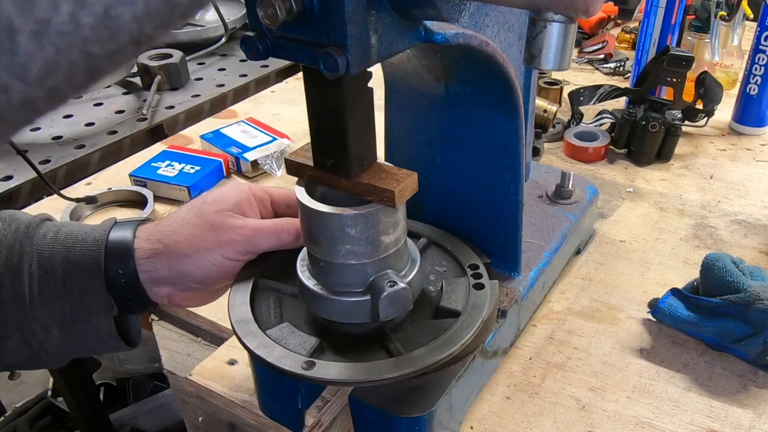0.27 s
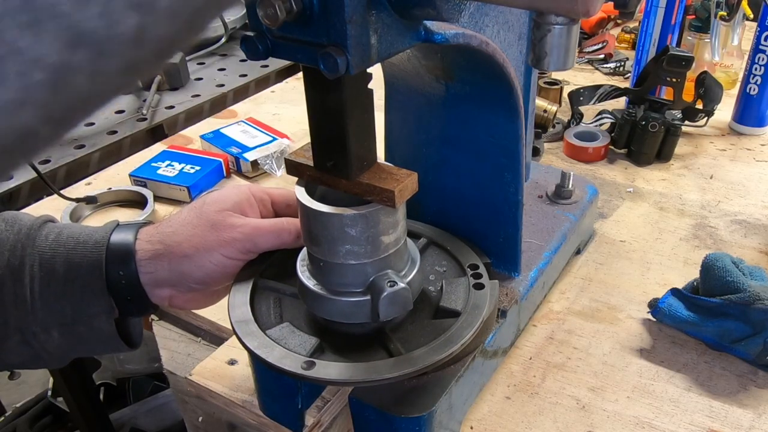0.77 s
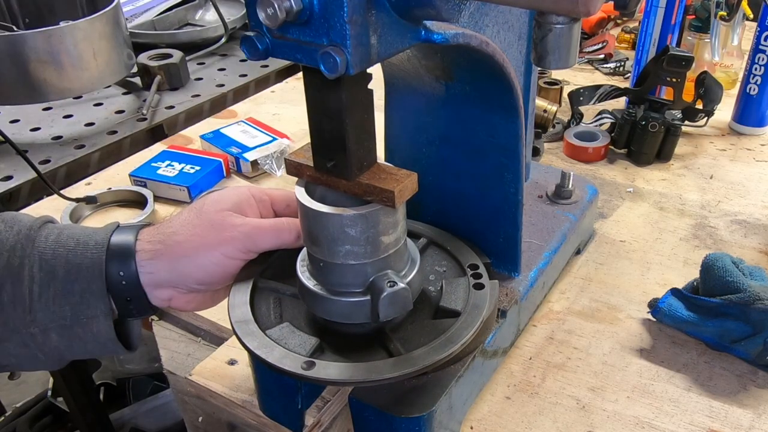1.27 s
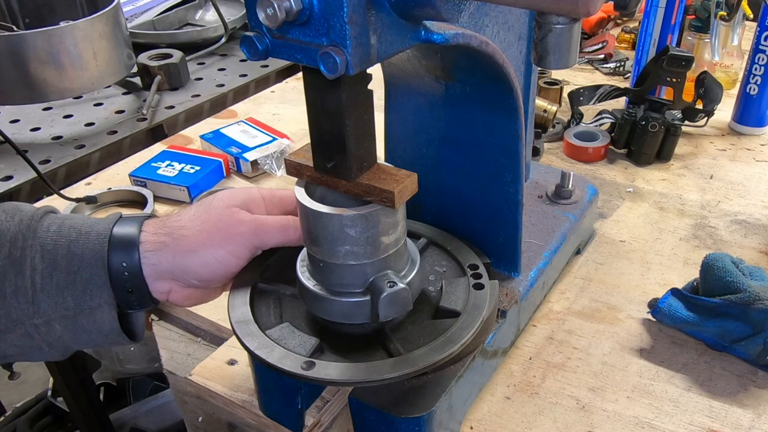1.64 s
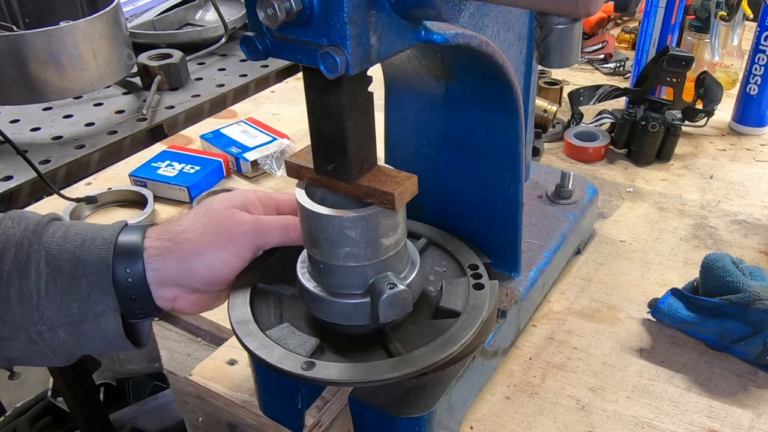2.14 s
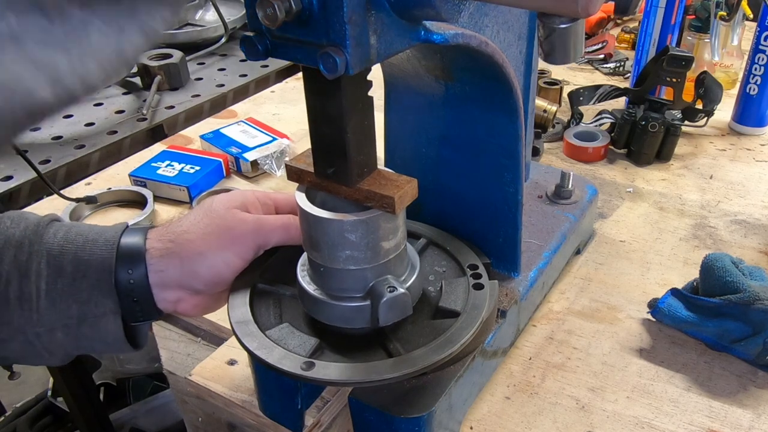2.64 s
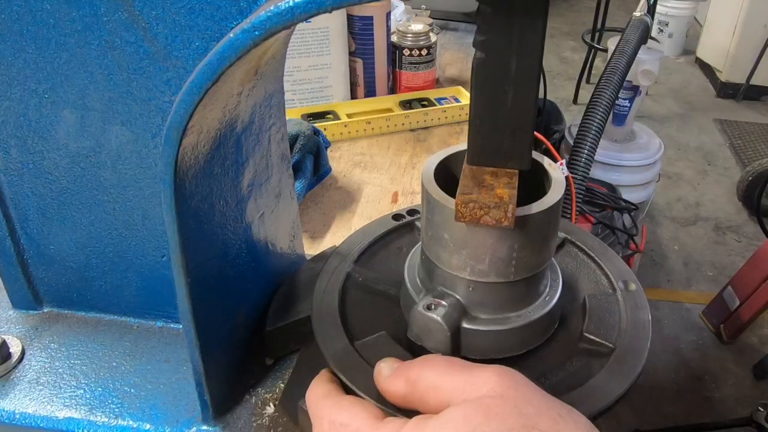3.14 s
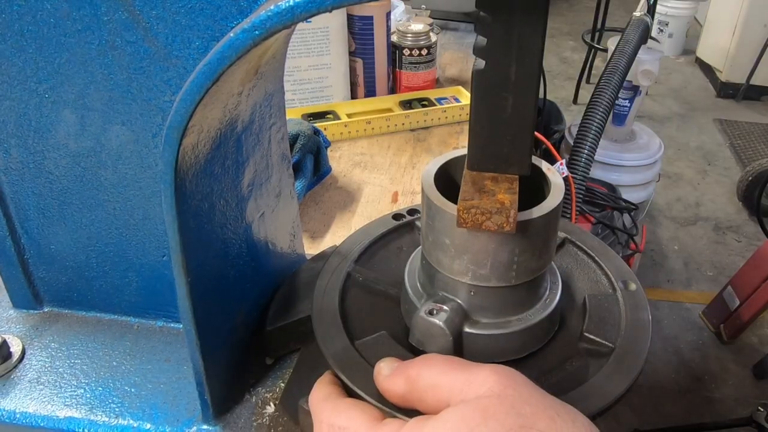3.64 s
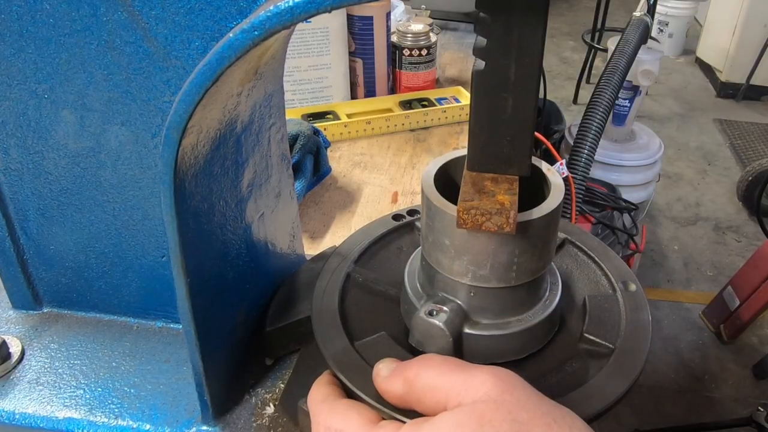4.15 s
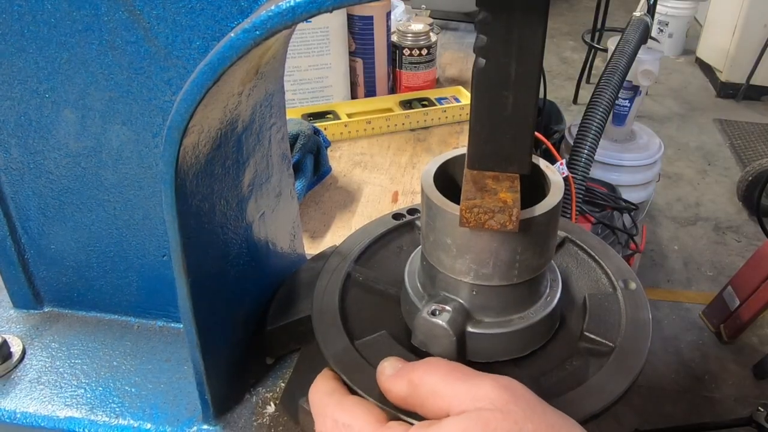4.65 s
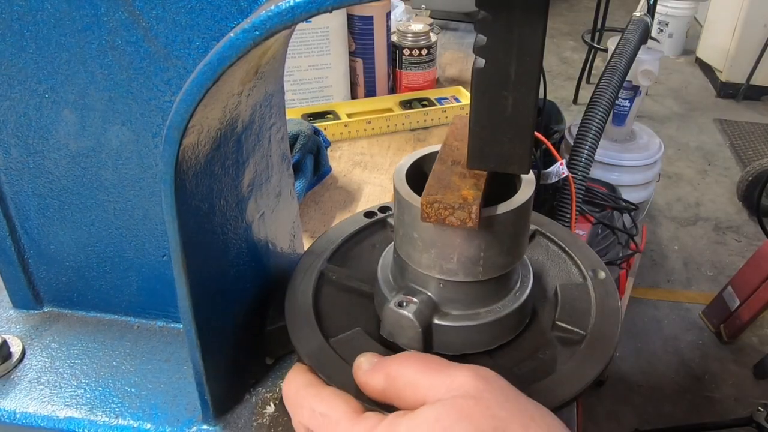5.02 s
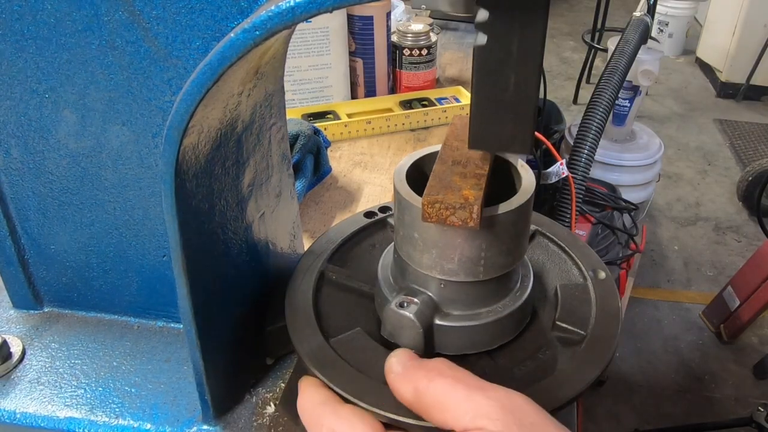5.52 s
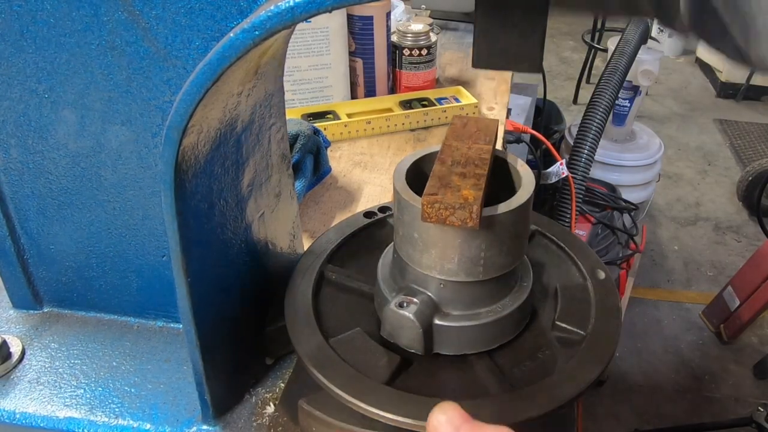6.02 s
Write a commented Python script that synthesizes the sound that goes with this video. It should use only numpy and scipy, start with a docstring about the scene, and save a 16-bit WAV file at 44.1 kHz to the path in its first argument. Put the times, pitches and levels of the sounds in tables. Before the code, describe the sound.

In a small workshop, a press lands deep knocks, a part slips home in jerks, the frame groans shortly, and loose metal clatters and fades.

```python
"""Arbor press in a small workshop

A hand arbor press on a wooden bench forces a bearing home through a wood block. The ram lands and the bearing
slips in jerks: short forces excite damped modes of frame and bench. Rack, lever and pulley tick and clink as
decaying sines and noise bursts. The frame groans and screeches once as the load comes off; sliding steel squeals
in faint gliding tones. Rubbing and rustling are banded noise over a faint hum and a thin whine of wavering level."""
import sys
import numpy as np
from scipy import signal
from scipy.fft import rfft, irfft, next_fast_len
from scipy.io import wavfile

SR = 44100
rng = np.random.default_rng(int(sys.argv[2]) if len(sys.argv) > 2 else 0)


def wav_record(signal):
    """Record a signal, one row per channel, as 16-bit PCM in the file named by sys.argv[1]."""
    frames = np.transpose(np.atleast_2d(signal))
    bounded = np.clip(frames, -1, 1)
    # unit amplitude maps onto the largest positive 16-bit level
    quanta = np.round(bounded * 32767).astype(np.int16)
    wavfile.write(sys.argv[1], SR, quanta)


N = 277080

# Modes of bench, frame, block and steel parts.
# Each row: frequency in Hz, relative level in dB, free 60 dB decay time in seconds.
PRESS_MODES = [(53.6, -9.5, 0.35), (89, -10, 0.15), (135.9, -3, 0.2), (219.3, -3, 0.076),
               (273.3, -12.5, 0.089), (319.7, -7, 0.079), (387.7, -6.5, 0.11), (410.3, 1.5, 0.049),
               (554.4, -15, 0.063), (749, 6, 0.018), (860, -17, 0.15), (1108, -12.5, 0.064),
               (1433, 5.5, 0.021), (1563, -1, 0.067), (2229, -12.5, 0.11), (2664, -11.5, 0.11),
               (3135, -2.5, 0.033), (3796, -6.5, 0.017), (4376, -11, 0.07), (4640, -7.5, 0.043),
               (5600, -10.5, 0.016), (6350, -16.5, 0.034), (8425, -13.5, 0.005)]
# Course of the groan, joined by straight lines.
# Each row: time in seconds, mean pitch in Hz, level in dB before its flutter.
GROAN_COURSE = [(4.405, 430.7, -36), (4.45, 382.8, -30.5), (4.525, 228, -29.5), (4.57, 206, -59)]


def from_db(db):
    """Decibels to amplitude ratio, 20 dB to a factor of ten."""
    return 10 ** (np.asarray(db) / 20)


def rms_one(x):
    """Normalize by the root mean square."""
    return x / np.sqrt(np.mean(x ** 2) + 1e-20)


def in_time(rows):
    """Linear interpolation of a table's columns, one value a sample."""
    s, *columns = np.transpose(rows)
    return [np.interp(np.arange(N) / SR, s, c) for c in columns]


def at_hz(hz_points, values, hz):
    """Linear interpolation of a spectrum on a logarithmic frequency axis."""
    return np.interp(np.log(hz), np.log(hz_points), values)


def drift(rate_hz):
    """Slow random modulation of rms 1: white noise through a two-pole low-pass at 1/40 of the sample rate."""
    r = np.exp(-80 * np.pi * rate_hz / SR)
    white = rng.standard_normal(N // 40 + 2002)
    slow = signal.lfilter([1], [1, -2 * r, r * r], white)[2000:]      # drop the filter's settling
    return np.interp(np.arange(N) / 40, np.arange(len(slow)), rms_one(slow))


def ring(force, hz, t60):
    """Damped resonator: a unit click sets a sine of initial height 1 ringing."""
    r = from_db(-60 / (max(t60, .003) * SR))
    w = 2 * np.pi * hz / SR
    return signal.lfilter([0, np.sin(w)], [1, -2 * r * np.cos(w), r * r], force + 1e-18)


def coloured(spectrum, patchy_db, alike):
    """Band-filtered stereo noise of rms 1: half octaves flicker jointly and singly; alike sets correlation."""
    out, together = 0, drift(6)
    edges = 25 * 2 ** np.arange(0, 9.6, .5)
    white = rng.standard_normal((2, 2, N))
    hz, db = np.transpose(spectrum)
    alike = np.clip(alike, 0, 1)
    for k, (low, high) in enumerate(zip(edges, edges[1:])):
        if hz[0] < high and low < hz[-1]:
            band = signal.butter(2, [low, high], "band", fs=SR, output="sos")
            mid, side = signal.sosfilt(band, white[k % 2])
            flicker_db = patchy_db * (together + .6 * drift(20))
            gain = from_db(at_hz(hz, db, np.sqrt(low * high)) + flicker_db)
            stereo = np.sqrt(1 + alike) * mid + np.sqrt(1 - alike) * side * [[1], [-1]]
            out = out + gain * stereo
    return rms_one(out)


def spells(rows, fall_db_per_s):
    """Envelopes linear in dB: each row swells up to its start, holds and falls; the loudest row wins."""
    swell_db = 30      # climb during a swell
    start, length, swell, *levels = np.transpose(rows)[:, :, None]
    t = np.arange(0, N + 64, 64) / SR
    before = swell_db / swell * np.maximum(start - t, 0)
    after = fall_db_per_s * np.maximum(t - start - length, 0)
    loss = before + after
    return [np.interp(np.arange(N) / SR, t, np.max(db - loss, axis=0)) for db in levels]


def all_jolts():
    """Stick-slip: slips unroll into uneven jolts beside the knocks; (s, level, bench, block, steel dB)."""
    # Single knocks through the frame.
    # Each row: start in seconds, level in dB, bench share in dB, hardness in dB.
    knocks = [(0.002, -49, -5, 4.5), (0.632, -48, 3.5, -4.5), (0.912, -41.5, 7, -9), (0.936, -28, -2.5, -5),
              (0.983, -29.5, 0.5, -1), (1.304, -31.5, -13, 3), (1.889, -23, 1.5, -6.5),
              (1.947, -29, 5.5, -12.5), (2.036, -5.5, -7.5, -24), (2.397, -5.5, -9.5, -9),
              (2.523, -49.5, 29, 7), (2.595, -23, -4, -18), (3.028, -3, -30.5, -15.5),
              (4.693, -16.5, -12, 6), (4.746, -22, 1.5, 4), (4.792, -37, -6, -12), (4.858, -18, -15, 4),
              (4.911, -20.5, -21, -1), (4.975, -23.5, -14, -8), (4.996, -18.5, -28, -5),
              (5.017, -17, -35, -6.5), (5.11, -13, -9.5, -4.5), (5.392, -34.5, 8, 1),
              (5.411, -23.5, -7, 7.5), (5.464, -16.5, 0, 11), (5.557, -23, -28, -36), (5.615, -36, 4, -11),
              (5.745, -31, -4, -7), (5.809, -28.5, -9.5, -8), (6.003, -27.5, -23, -40),
              (6.032, -35.5, -1, -14), (6.081, -31.5, -19, -24), (6.114, -31, -12, -21.5),
              (6.147, -33, -26.5, -10)]
    # Slips of the bearing on its way home. Each row: start in seconds, length in seconds,
    # level in dB before breakaway and unevenness, bench share in dB, hardness in dB, steel over hardness in dB.
    slips = [(2.902, 0.06, -23, -3.5, -10, -21), (2.991, 0.037, -20.5, 0.5, -25, -12),
             (3.175, .09, -10, -5, -2, -7.5), (3.553, 0.046, -10.5, -7.5, 1, -11.5)]
    judder_s, judder_spread_db = .0078, 2      # spacing and unevenness of the jolts in a slip
    breakaway_db = 8.5                         # the first jolt gets this on top
    knock_steel_db = -11                       # steel against the block in a knock
    rows = [(s, db, bench, hard, hard + knock_steel_db) for s, db, bench, hard in knocks]
    chance = rng.standard_normal((len(slips), 16, 2))
    for (s, length, db, bench, hard, steel), luck in zip(slips, chance):
        rows.append((s, db + breakaway_db, bench, hard, hard + steel))
        for k, (late, loud) in enumerate(luck, start=1):
            left = np.clip(1 + length / judder_s - k, 1e-4, 1)      # jolts past the end all but vanish
            jolt_s = s + judder_s * (k + .1 * late)
            jolt_db = db + judder_spread_db * loud + 20 * np.log10(left)
            rows.append((jolt_s, jolt_db, bench, hard, hard + steel))
    return rows


def jolts(rumble_db, rub_db):
    """Modal excitation: jolts swing heavy modes and scratch light ones; gear teeth and rubbing stir them."""
    # Frequencies in Hz at which a jolt's spectrum is set: bench, frame, block, then three for the edge,
    # steel and top.
    zones_hz = [140, 400, 1200, 2600, 4700, 8400]
    steel_edge_db, steel_top_db = -14, -7      # 2.6 kHz and 8.4 kHz against the block
    swing_s, scratch_s = .0038, .0042          # rise time in the heavy parts, decay constant in the light
    load_damping = .25      # share of ring time left to the light parts, clamped under load
    rubbed_t60_s = .012     # ring time of parts being rubbed
    t, rows = np.arange(int(.04 * SR)) / SR, all_jolts()
    swing = t * np.exp(-t / swing_s)      # heavy parts take time to get moving
    scratch = rng.standard_normal((len(rows), len(t))) * np.sqrt(t) * np.exp(-t / scratch_s)
    scratch = scratch / np.sqrt(np.sum(scratch ** 2, axis=1, keepdims=True))
    phases = rng.uniform(0, 2 * np.pi, (len(rows), len(PRESS_MODES), 1))
    teeth = from_db(rumble_db - 27 + 3 * drift(20)) * rng.standard_normal(N)
    rubbing = from_db(rub_db - 25) * rng.standard_normal(N)
    out = np.zeros(N)
    for k, (hz, mode_db, t60) in enumerate(PRESS_MODES):
        gain = (-1) ** k * from_db(mode_db)      # neighbouring modes swing in opposite phase
        force = np.zeros(N + len(t))
        heavy = hz < 600
        if heavy:
            pushes = 2 * swing / swing.sum() * np.sin(2 * np.pi * hz * t + phases[:, k])
        else:
            pushes = scratch
        for (s, db, bench, block, steel), push in zip(rows, pushes):
            i = round(s * SR)
            zones_db = [bench, 0, block, block + steel_edge_db, steel, block + steel_top_db]
            force[i:i + len(t)] += from_db(db + at_hz(zones_hz, zones_db, hz)) * push
        if heavy:
            out += gain * ring(force[:N] + teeth, hz, t60)
        else:
            wander = from_db(5 * drift(8))      # the contact wanders from mode to mode
            sung = wander * ring(rubbing, hz, rubbed_t60_s)
            out += gain * (ring(force[:N], hz, t60 * load_damping) + sung)
    return out


def ticks():
    """Impact of hard bodies: a contact cracks for a few ms and rings the modes near its own centre."""
    # Sharp steel contacts. Each row: start in seconds, relative level in dB, centre frequency in Hz.
    contacts = [(0.9241, -46, 3000), (0.9508, -30.5, 4000), (0.986, -29.5, 3250), (1.2518, -41.5, 2130),
                (1.3037, -32, 2680), (1.7862, -55.5, 1500), (1.821, -58, 3150), (2.0343, -34, 2180),
                (2.1403, -53.5, 1740), (2.1426, -54.5, 7000), (2.398, -24, 1880), (3.028, -28, 2420),
                (3.2684, -28, 2140), (3.533, -55, 3200), (3.544, -36, 3200), (3.5552, -15, 3280),
                (4.4235, -38, 2570), (4.6626, -52.5, 6100), (4.6833, -30.5, 3370), (4.6995, -18.5, 2300),
                (4.7449, -21, 1950), (4.846, -27.5, 2440), (4.8675, -38, 4000), (4.9078, -36.5, 3770),
                (4.9895, -31, 2770), (5.018, -54, 4300), (5.1059, -28, 1930), (5.1242, -30, 2580),
                (5.175, -50, 3030), (5.2033, -45.5, 3150), (5.411, -26.5, 2010), (5.467, -24.5, 3550),
                (5.6067, -39, 2140)]
    crack_s, below, above = .003, 1.6, 1.4      # decay constant; band edges as ratios of the centre
    t, out = np.arange(int(.2 * SR)) / SR, np.zeros(N + SR)
    hz, mode_db, t60 = np.array(PRESS_MODES).T[:, :, None]
    chance = rng.standard_normal((len(contacts), len(PRESS_MODES), 1))
    grit = rng.standard_normal((len(contacts), len(t)))
    for (s, db, centre_hz), luck, rough in zip(contacts, chance, grit):
        near_db = -45 * np.log2(hz / centre_hz) ** 2 + 2 * luck
        modes = from_db(mode_db + near_db - 60 * t / t60) * np.sin(2 * np.pi * hz * t)
        band = signal.butter(2, [centre_hz / below, centre_hz * above], "band", fs=SR, output="sos")
        crack = signal.sosfilt(band, rough) * np.exp(-t / crack_s)
        i = round(s * SR)
        out[i:i + len(t)] += from_db(db) * (0.73 * modes.sum(axis=0) + 3.12 * crack)
    return out[:N]


def groan():
    """Friction-driven oscillation: a sliding joint chatters unevenly, its pitch sinking as the load comes off."""
    hz, db = in_time(GROAN_COURSE)
    start, end = GROAN_COURSE[0][0], GROAN_COURSE[-1][0]
    on = np.interp(np.arange(N) / SR, [start, start + .01, end - .01, end], [0, 1, 1, 0])
    phase = 2 * np.pi * np.cumsum(hz * (1 + .05 * drift(40))) / SR
    tone = np.sin(phase) + 0.1 * np.sin(2 * phase)
    band = signal.butter(4, [130, 650], "band", fs=SR, output="sos")
    rough = rms_one(signal.sosfilt(band, rng.standard_normal(N)))
    return on * from_db(db) * (from_db(5.1 * drift(53)) * tone + 0.39 * rough)


def screech():
    """Resonance under noise: grit sets in with the groan and sings in fixed steel bands that flicker singly."""
    # Screeching bands. Each row: centre frequency in Hz, level in dB before flicker and fade.
    bands = [(1040, -57.5), (1610, -70), (2170, -57.5), (3130, -59), (3850, -60), (4350, -63.5),
             (6610, -62)]
    ring_t60_s, fade_db_per_s = 0.013, 173
    t = np.arange(N) / SR
    grit = rng.standard_normal(N) * from_db(4 * drift(150))
    fade_from = GROAN_COURSE[-1][0] - .02
    on = (t > GROAN_COURSE[0][0]) * from_db(-fade_db_per_s * np.maximum(t - fade_from, 0))
    out = np.zeros(N)
    for hz, db in bands:
        out += from_db(db + 3 * drift(25)) * rms_one(ring(grit, hz, ring_t60_s))
    return on * out


def clinks():
    """Free decay of one mode: each small loose part gets one tap and rings with a buzz."""
    # Loose parts. Each row: start in seconds, pitch in Hz, initial level in dB before the buzz.
    taps = [(2.148, 7800, -56), (4.247, 2676, -65), (4.387, 2100, -70.5)]
    t60_s, rattle_db = .09, 6      # ring time; the parts lie loose and buzz
    t, out = np.arange(int(.25 * SR)) / SR, np.zeros(N)
    for s, hz, db in taps:
        i = round(s * SR)
        out[i:i + len(t)] += from_db(db - 60 * t / t60_s) * np.sin(2 * np.pi * hz * t)
    return out * from_db(rattle_db * drift(90))


def squeals():
    """Frequency-modulated sines: thin unsteady tones of sliding steel swell, glide or hold, and fade."""
    # Squeals. Each row: start in seconds, length in seconds, first pitch in Hz, last pitch in Hz,
    # level at mid-length in dB before flutter.
    glides = [(5.56, .17, 8300, 7100, -74), (5.84, .07, 5450, 5450, -73), (5.82, .12, 3750, 3650, -69),
              (5.98, .12, 2750, 2700, -69)]
    wobble = .003 * drift(120)      # share of pitch
    flutter_db = 4 * drift(60)
    out = np.zeros(N)
    for s, length, from_hz, to_hz, db in glides:
        along, i = np.linspace(0, 1, round(length * SR)), round(s * SR)
        hz = (from_hz + (to_hz - from_hz) * along) * (1 + wobble[i:i + len(along)])
        tone = np.sin(2 * np.pi * np.cumsum(hz) / SR)
        out[i:i + len(along)] += from_db(db) * np.sin(np.pi * along) * tone
    return out * from_db(flutter_db)


def stroke_levels():
    """Envelopes of friction: levels of gear rumble and rubbing follow the strokes of lever and rack, in dB."""
    # Strokes. Each row: start in seconds, length in seconds, swell before the start in seconds,
    # relative gear rumble in dB, rubbing level in dB.
    strokes = [(.275, 0.018, 0.0054, -64.5, -63.5), (.91, .08, 0.16, -81, -62.5),
               (1.11, 0.095, .03, -85, -71), (1.22, 0.062, 0.035, -51, -64.5), (1.33, .38, .05, -64, -64.5),
               (1.78, .05, .02, -79, -61.5), (2.45, 0.19, 0.034, -35, -62.5),
               (2.76, 0.023, 0.092, -31, -61), (2.905, 0.07, 0.091, -24, -50.5),
               (4.407, 0.14, 0.006, -47, -57), (4.56, 0.19, .03, -64, -60), (4.68, .44, 0.029, -32, -56.5),
               (5.4, .28, 0.047, -42.5, -59.5), (5.72, .24, .03, -42.5, -59.5),
               (6.0, 0.15, .03, -50.5, -65), (6.2, .1, 0.036, -55.5, -71.5)]
    return spells(strokes, fall_db_per_s=257)


def rubbed_surfaces(rub_db):
    """Friction noise: rubbing is banded noise with a gritty level."""
    # Spectrum of rubbing. Each row: frequency in Hz, relative density in dB per Hz.
    rub_spectrum = [(400, -23.5), (600, -10), (1400, 1.5), (2000, -0.5), (3000, -4.5), (5000, -6),
                    (7500, -30.5), (9500, -36.5)]
    gritty_db = rub_db + 2.5 * drift(150)
    return from_db(gritty_db) * coloured(rub_spectrum, patchy_db=3, alike=.7)


def rustling():
    """Band-filtered noise under an envelope: patchy rustle, 3 dB up on the left and 3 dB down on the right."""
    # Spells of rustle: passes of a sleeve, and at 4.405 s a rustle that starts abruptly and holds a second.
    # Each row: start in seconds, length in seconds, swell before the start in seconds,
    # rustle level in dB before the left-right balance.
    rustle_spells = [(.92, 0.019, .35, -66), (1.13, 0.045, .07, -62), (1.23, 0.077, .07, -60.5),
                     (1.42, 0.33, .1, -73), (4.405, 1, .005, -63), (5.34, 0.12, .2, -56),
                     (5.45, 0.3, .1, -67), (5.7, 0.82, .1, -69.5), (6.13, 0.14, .1, -66)]
    # Spectrum of the rustle. Each row: frequency in Hz, relative density in dB per Hz.
    rustle_spectrum = [(2060, -58), (3500, 6.5), (5900, -10), (8740, 23), (9420, -3), (10800, -48.5),
                       (14400, -6), (15500, -54)]
    rustle_db, = spells(rustle_spells, fall_db_per_s=192)
    rustle = coloured(rustle_spectrum, patchy_db=2.0, alike=0.46)
    return from_db(rustle_db) * rustle * from_db([[3], [-3]])


def workshop(x):
    """Reverberation by eight feedback delays a side; the bass dies sooner than the treble."""
    bass_t60_s, treble_t60_s = 0.28, 0.32      # under 500 Hz and over 2.5 kHz
    wide_from_hz, bass_apart = 465, .05        # the sides differ above this; share of difference in the bass
    size = next_fast_len(N + SR)
    hz = np.arange(size // 2 + 1) / size * SR
    t60 = np.interp(hz, [500, 2500], [bass_t60_s, treble_t60_s])
    lags = np.round(np.geomspace(.011, .043, 16) * SR) / SR
    loops = [from_db(-60 * lag / t60) * np.exp(-2j * np.pi * hz * lag) for lag in lags]
    left, right = [sum((-1) ** k * g / (1 - g) for k, g in enumerate(loops[c::2])) for c in (0, 1)]
    apart = bass_apart + 1 / (1 + (wide_from_hz / (hz + 1)) ** 4)      # long waves reach both sides alike
    mid, side = (left + right) / 2, apart * (left - right) / 2 * 1.2
    return irfft(rfft(x, size) * np.array([mid + side, mid - side]), size)[:, :N]


def room_hum():
    """Stationary coloured noise: a faint hum, strongest in the bass."""
    # Spectrum of the hum. Each row: frequency in Hz, relative density in dB per Hz.
    hum_spectrum = [(15, -30), (48, -7.5), (115, -28.5), (169, -9), (541, -31.5), (2070, -37.5),
                    (3380, -43.5), (12000, -48), (15600, -76.5), (22000, -120)]
    return from_db(-65) * coloured(hum_spectrum, patchy_db=1.2, alike=.8)


def whine():
    """Amplitude-modulated sine: a faint high tone of wavering level."""
    hz, level_db = 9050, -96
    return from_db(level_db + 3 * drift(9)) * np.sin(2 * np.pi * hz * np.arange(N) / SR)


def scene():
    """Superposition: press and its room, filtered, with hum, rubbing, rustling and whine added."""
    left_treble_hz, left_share = 6370, 0.54      # the press leans left above this
    room_db = -14
    bass_edge_hz, top_edge_hz, top_db = 90.3, 11000, -24.5
    rumble_db, rub_db = stroke_levels()
    press = jolts(rumble_db, rub_db) + ticks() + groan() + screech() + clinks() + squeals()
    treble = signal.sosfilt(signal.butter(2, left_treble_hz, "high", fs=SR, output="sos"), press)
    near = press + left_share * treble * [[1], [-1]] + from_db(room_db) * workshop(press)
    near = signal.sosfilt(signal.butter(3, bass_edge_hz, "high", fs=SR, output="sos"), near)
    near = near + room_hum()
    below_top = signal.sosfilt(signal.cheby2(10, 40, top_edge_hz, fs=SR, output="sos"), near)
    rolled_off = below_top + from_db(top_db) * (near - below_top)      # the microphone rolls off the top
    return rolled_off + rubbed_surfaces(rub_db) + rustling() + whine()


def record(dry):
    """Soft saturation rounds the peaks; a steep low-pass cuts the top from 15.8 kHz."""
    rounded = 0.76 * np.tanh(dry / 0.77)
    return signal.sosfilt(signal.cheby2(12, 70, 15800, fs=SR, output="sos"), rounded)


dry = scene()
out = record(dry)
wav_record(out)
```